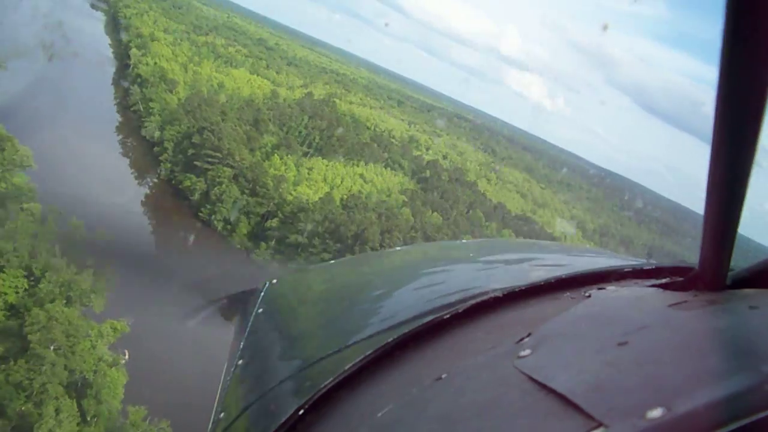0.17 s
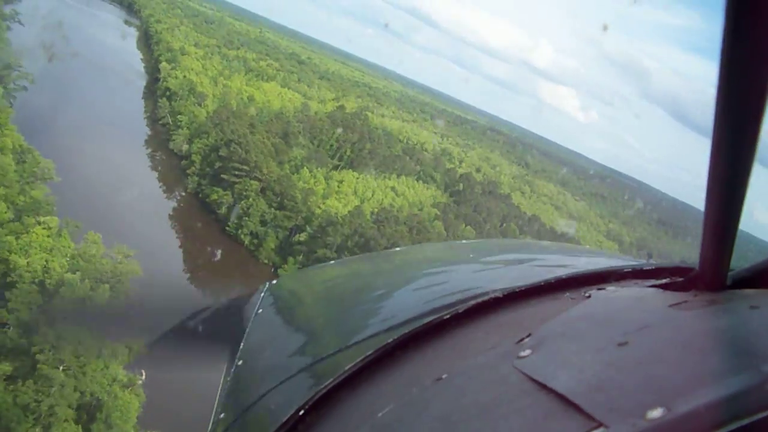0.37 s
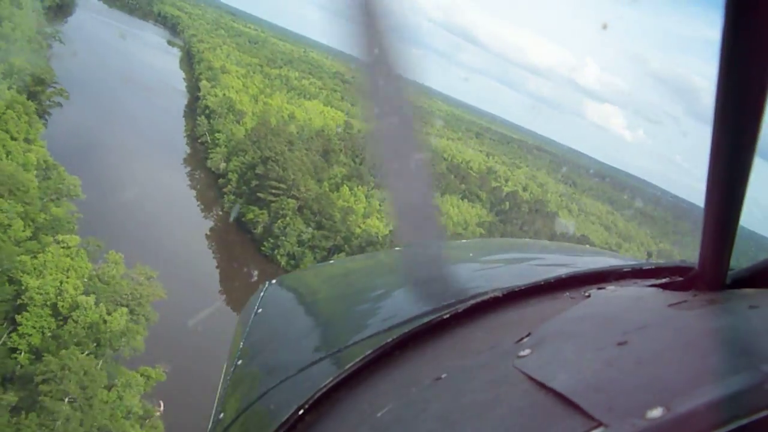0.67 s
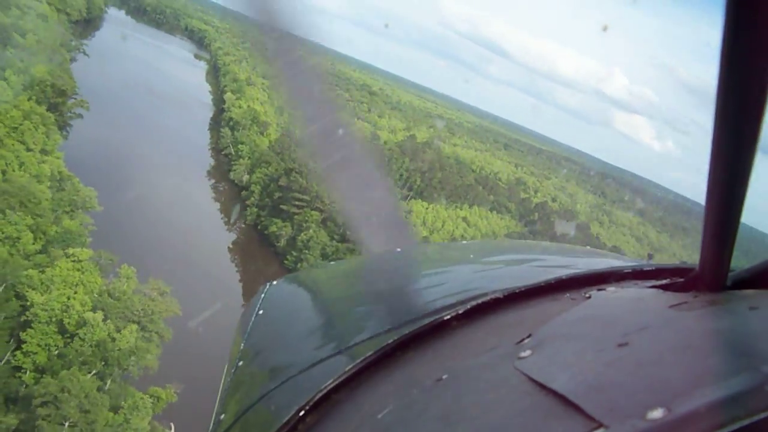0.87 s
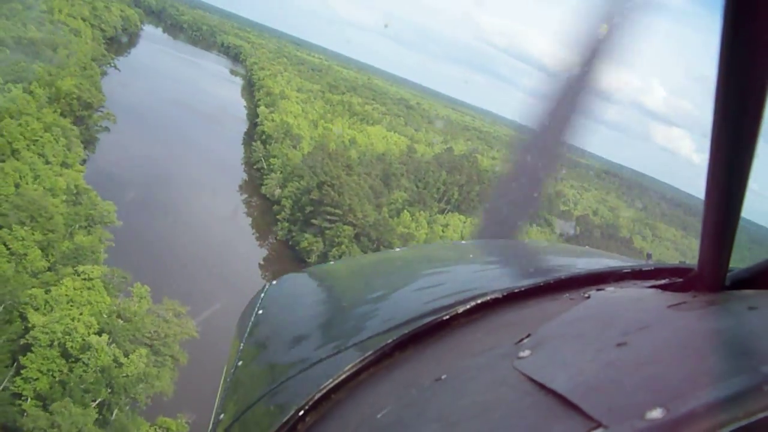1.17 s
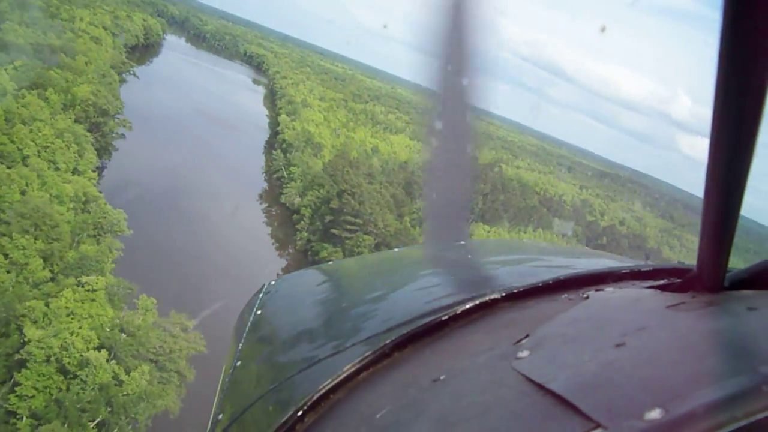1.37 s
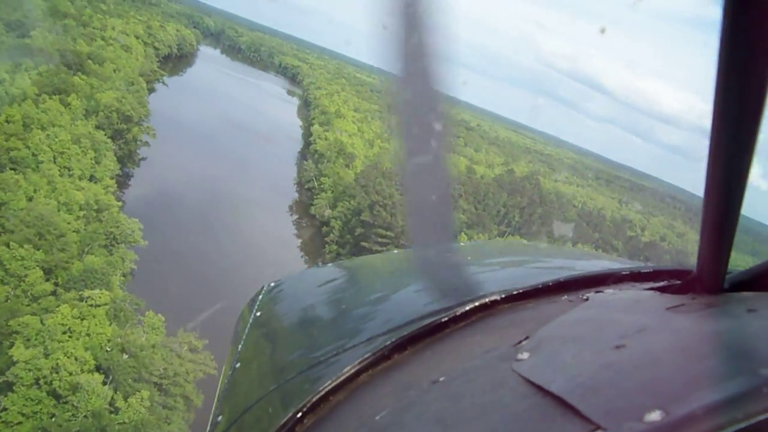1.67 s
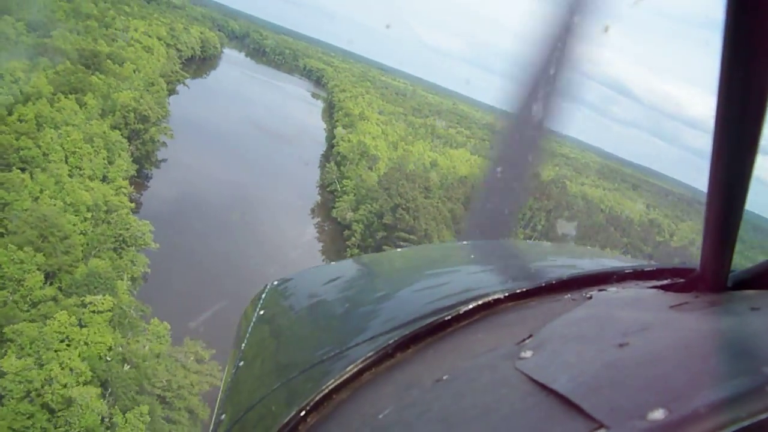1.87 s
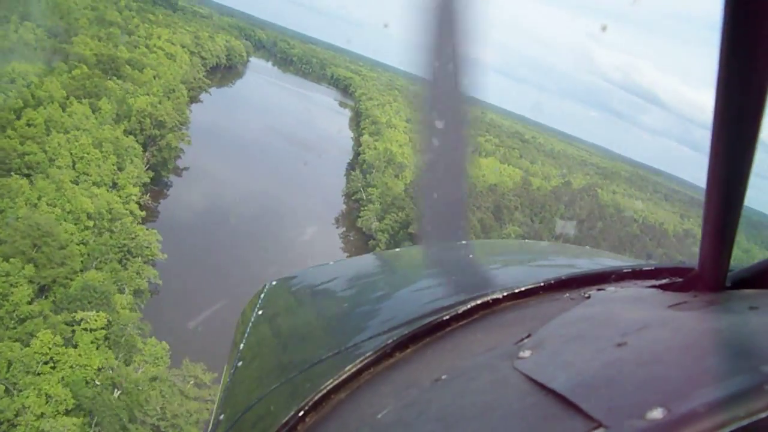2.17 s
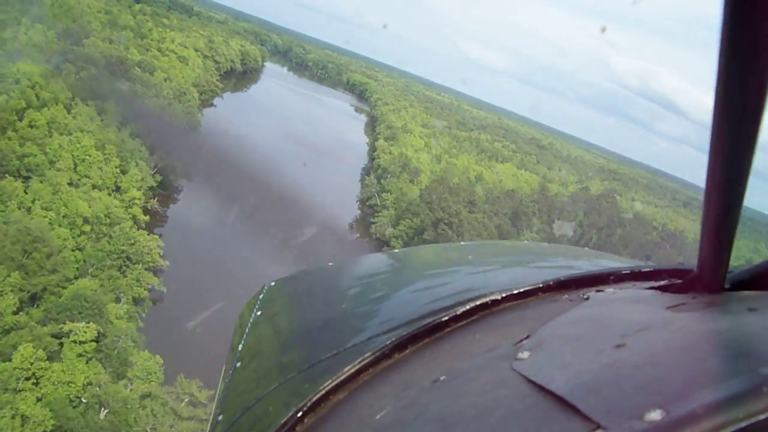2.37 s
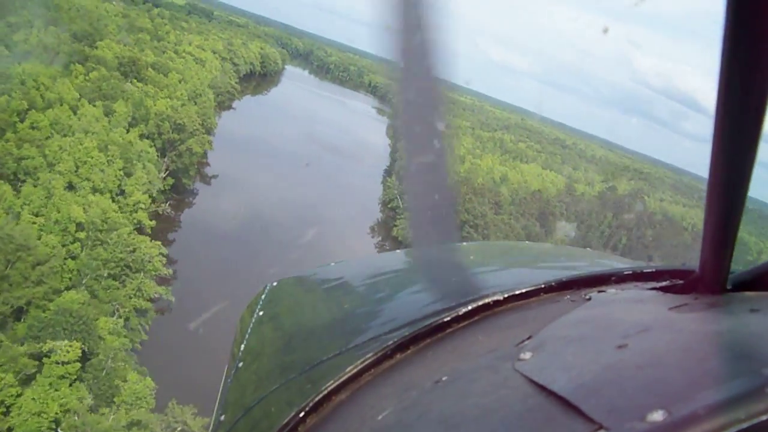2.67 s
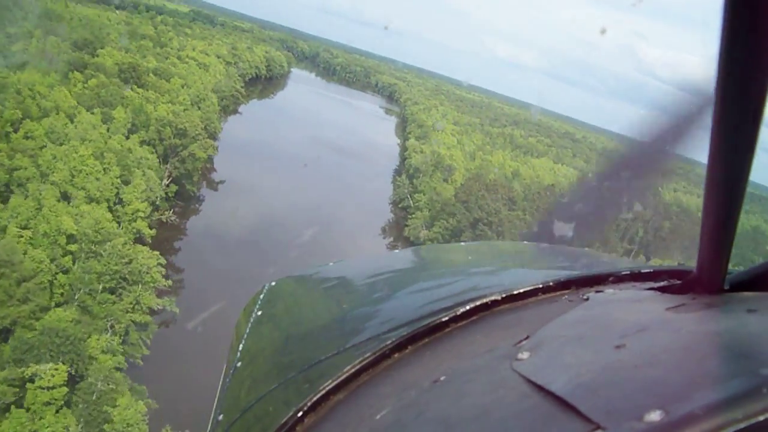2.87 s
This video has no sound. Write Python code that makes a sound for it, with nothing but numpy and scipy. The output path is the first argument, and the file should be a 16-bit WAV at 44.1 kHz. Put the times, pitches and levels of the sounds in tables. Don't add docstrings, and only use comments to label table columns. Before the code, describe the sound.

Inside a light propeller aircraft in flight, a loud continuous low roar of wind and engine hum, with throbbing cabin air, soft irregular thuds and faint hiss, picked up by a small low-fidelity camera microphone.

```python
import sys
import numpy as np
from scipy import signal
from scipy.fft import rfft, irfft
from scipy.io import wavfile
from scipy.ndimage import uniform_filter1d

SR = 44100
rng = np.random.default_rng(int(sys.argv[2]) if len(sys.argv) > 2 else 0)


def dump_mix(stems):
    frames = np.atleast_2d(stems).T
    limited = np.clip(frames, -1, 1)
    pcm = np.round(limited * 32767).astype(np.int16)
    wavfile.write(sys.argv[1], SR, pcm)


def ratio_of_db(decibels):
    return 10 ** (np.asarray(decibels, float) / 20)


N = 133182
T = np.arange(N) / SR
F = np.maximum(np.fft.rfftfreq(N, 1 / SR), 1)

# [f/Hz, level/dB per Hz]
ROAR = [(2, -12.5), (30, -4), (60, -11.5), (170, -18), (350, -23.5), (930, -29), (2400, -40.5), (4600, -53)]
# [f/Hz, width/Hz, gain/dB]
CABIN_MODES = [(49.44, 12, 3.5), (164, 46, 2.5), (254.4, 32, 2.5), (291.8, 30, 4), (479, 98, 3),
               (876, 45, 2), (937, 70, -3), (1090, 170, 1.5), (1330, 89, 2.5), (2420, 330, 1),
               (2570, 59, 1.5)]
# [t/s, level/dB]
GUST = [
    (0, 0.5),
    (.4, 0),
    (.8, 0.5),
    (1.2, 0),
    (1.6, 1),
    (2.1, -.5),
    (2.35, 0),
    (2.7, 0),
    (3.02, -1.5),
]
# [t/s, f/Hz, peak level/dB]
SLAPS = [(0.016, 93, -23), (0.04, 49.7, -15), (0.091, 64, -19), (0.25, 64, -14), (0.363, 63.7, -18),
         (0.408, 198, -25.5), (0.52, 198, -22.5), (0.676, 182.1, -22), (0.699, 229, -22),
         (0.898, 154.2, -19), (0.927, 132, -20.5), (0.995, 64.5, -16), (1.045, 296, -19.5),
         (1.065, 91, -17.5), (1.26, 63.7, -16), (1.486, 307, -26), (1.505, 138, -17), (1.55, 53.1, -18),
         (1.554, 98.4, -21), (1.615, 152, -16), (1.637, 305, -21.5), (1.683, 153, -20.5),
         (1.853, 45, -12.5), (1.889, 237, -22.5), (1.915, 53.5, -19.5), (1.934, 238, -20),
         (1.981, 81.5, -15.5), (2.106, 99, -14), (2.13, 54.9, -19.5), (2.143, 154, -16),
         (2.231, 195, -16.5), (2.242, 52.8, -22.5), (2.252, 90.1, -17.5), (2.263, 151, -15.5),
         (2.353, 152.2, -18.5), (2.379, 198, -18), (2.429, 231.7, -23.5), (2.428, 153, -19.5),
         (2.466, 257, -18), (2.518, 196.3, -20), (2.543, 198, -20), (2.588, 153.3, -16),
         (2.615, 293, -14.5), (2.683, 54.6, -19), (2.726, 216, -16.5), (2.834, 233, -18.5),
         (2.907, 70, -16.5), (2.98, 301.8, -25.5), (3.004, 54.2, -19), (3.011, 99, -15.5)]
# [t/s, level/dB]
BUFFET = [(0.0, -26.5), (0.09, -19.5), (0.9, -17), (1.02, -8.5), (1.17, -35.5), (1.29, -13), (1.73, -13),
          (1.79, -27.5), (1.89, -7.5), (2.07, -23.5), (2.53, -14.5), (2.62, -38), (2.68, -14),
          (3.02, -27.5)]
# [t/s, f/Hz, level/dB]
THROB = [
    (0, 28.24, -26.5),
    (.4, 28.42, -17),
    (.8, 28.23, -19.5),
    (1.2, 27.65, -20.5),
    (1.55, 28.1, -19.5),
    (1.9, 28.68, -29),
    (2.4, 28.3, -25.5),
    (2.75, 28.11, -20),
    (3.02, 28.91, -19),
]
# [t/s, f/Hz, level/dB]
ENGINE = [
    (0, 77.67, -28),
    (1.4, 77.85, -29),
    (1.8, 81.8, -24.5),
    (2.05, 79, -26.5),
    (2.3, 77.26, -22),
    (2.6, 76.18, -25),
    (2.85, 73.08, -21),
    (3.02, 71.9, -21.5),
]
# [multiple of firing rate, level/dB]
ENGINE_ORDERS = [
    (.5, 4),
    (1, 0.5),
    (1.5, -14),
    (2, -13),
]
# [t/s, f/Hz, level/dB]
PANEL = [
    (0, 22.27, -26),
    (.4, 22.25, -26),
    (1.2, 22.17, -25),
    (1.55, 21.97, -27.5),
    (1.9, 21.91, -34),
    (2.3, 21.25, -31),
    (3.02, 21.15, -31),
]
# [multiple of drumming rate, level/dB]
PANEL_ORDERS = [(2, -1), (3, 1.5), (4, -13), (5, -1), (6, -10), (7, -14), (8, -6.5)]
# [f/Hz, level/dB per Hz]
LEAK = [(3800, -26.5), (4600, -12), (5200, -7.5), (5900, -2), (6800, -3), (7300, -1), (7700, -0.5),
        (8000, -2)]


def col(table, index):
    rows = np.array(table)
    return np.interp(T, rows[:, 0], rows[:, index])


def level(x, db):
    return x * ratio_of_db(db) / np.sqrt(np.mean(x ** 2))


def walk(rate_hz):
    hold = int(SR / rate_hz)
    steps = np.repeat(rng.standard_normal(N // hold + 1), hold)
    slewed = uniform_filter1d(uniform_filter1d(steps, hold), hold)
    return level(slewed[:N], 0)


def colour(table):
    hz, db = np.array(table).T
    return np.interp(np.log(F), np.log(hz), db, -120, -120)


def air(db, lo_hz, hi_hz, flicker_db, swell_db):
    spectrum = rfft(rng.standard_normal(N)) * ratio_of_db(db)
    third_octave = 3 * np.log2(F)
    out = 0
    for centre in np.arange(np.floor(3 * np.log2(lo_hz)), 3 * np.log2(hi_hz) + 1):
        share = np.clip(1 - abs(third_octave - centre), 0, 1)
        out = out + ratio_of_db(swell_db + flicker_db * walk(15)) * irfft(spectrum * share, N)
    return out


def stack(table, orders, jitter, rough_db, lift=0):
    turn = 2 * np.pi * np.cumsum(col(table, index=1) * (1 + jitter * walk(4))) / SR
    db = col(table, index=2)
    out = 0
    for order, gain_db in orders:
        load_db = lift * (db - db.max()) if order < 1 else 0
        swell = np.sqrt(2) * ratio_of_db(db + gain_db + rough_db * walk(3) + load_db)
        out = out + swell * np.sin(order * turn + 2 * np.pi * rng.random())
    return out


def slipstream():
    db = colour(ROAR)
    for hz, width_hz, gain_db in CABIN_MODES:
        db = db + gain_db * np.exp(-2 * ((F - hz) / width_hz) ** 2)
    flutter_db = .6 * walk(40)
    return level(air(db, 2, 4600, .6, .6 * col(GUST, index=1) + flutter_db), -17.5)


def slaps():
    cycles, trim_db = 1.05, -0.5
    out = 0
    for start, hz, db in SLAPS:
        turns = (T - start) * hz
        swell = ratio_of_db(db + trim_db) * np.exp(-.5 * (turns / cycles) ** 2)
        out = out + swell * np.sin(2 * np.pi * (turns + rng.random()))
    return out


def buffet():
    pitch_hz = 18.5 * (1 + .05 * walk(4.6))
    throb = np.sqrt(2) * np.sin(2 * np.pi * np.cumsum(pitch_hz) / SR)
    ratio = F / 19
    rumble = irfft(rfft(rng.standard_normal(N)) * ratio ** 2 / (1 + ratio ** 5), N)
    first = ratio_of_db(col(BUFFET, index=1)) * level(throb + level(rumble, -6.5), -1)
    second = stack(THROB, [(1, 0)], jitter=.015, rough_db=1.5)
    return first + second


def engine():
    return stack(ENGINE, ENGINE_ORDERS, jitter=.004, rough_db=1.5, lift=1.5)


def panel():
    return stack(PANEL, PANEL_ORDERS, jitter=.002, rough_db=1.7)


def leak():
    swell_db = 0.46 * col(GUST, index=1) + .7 * walk(14)
    return level(air(colour(LEAK), 3800, 8000, 0.43, swell_db), -40)


def scene():
    return (slipstream() + slaps() + buffet() + engine() + panel() + leak())[None]


def compand(x):
    full_scale = .705
    size = np.minimum(abs(x) / full_scale * 8192, 8158) + 33
    step = 2 ** (np.floor(np.log2(size)) - 4)
    middle = (np.floor(size / step) + .5) * step
    return np.sign(x) * (middle - 33) / 8192 * full_scale


def band_limit(x):
    return signal.sosfilt(signal.butter(12, 15700, fs=SR, output="sos"), x)


def record(dry):
    port_hz, port_width_hz, port_db = 4186, 550, -15
    dip_db = port_db * np.exp(-2 * ((F - port_hz) / port_width_hz) ** 2)
    mic = irfft(rfft(dry) * ratio_of_db(dip_db), N)
    soft = np.tanh(.95 * mic) / .95
    stored = compand(signal.resample_poly(soft, 160, 441, axis=1, padtype="reflect"))
    taps = signal.firwin(40 * 441 + 1, 1.01 / 441, window=("kaiser", 9.5))
    wide = signal.resample_poly(stored, 441, 160, axis=1, window=taps, padtype="reflect")[:, :N]
    treble = np.clip(F / 4000 - 2.7, 0, 1)
    grit = irfft(rfft(wide * rng.standard_normal(N)) * treble, N)
    return band_limit(wide + ratio_of_db(-90) * grit)


dry = scene()
out = record(dry)
dump_mix(out)
```